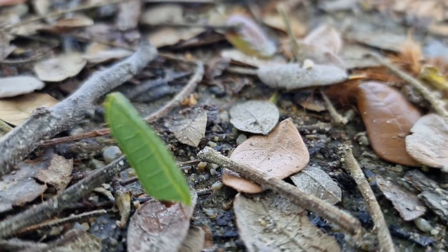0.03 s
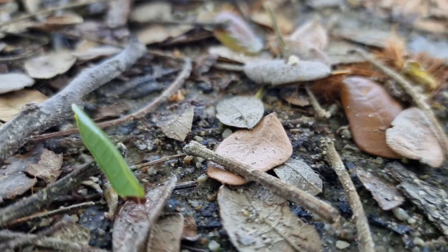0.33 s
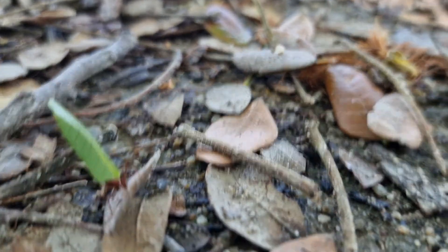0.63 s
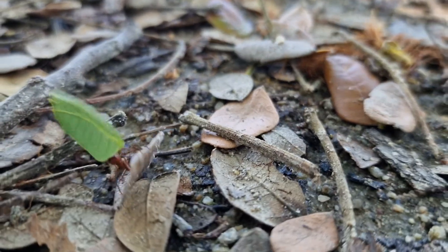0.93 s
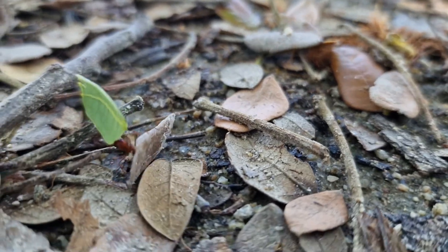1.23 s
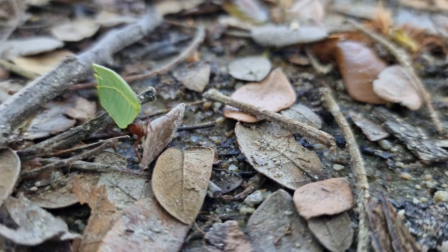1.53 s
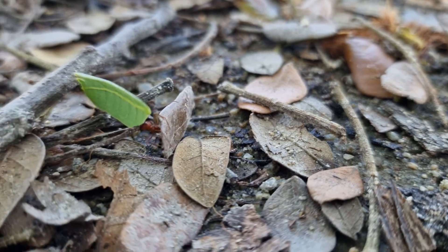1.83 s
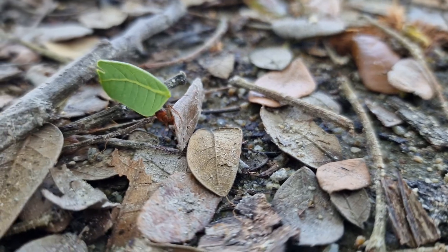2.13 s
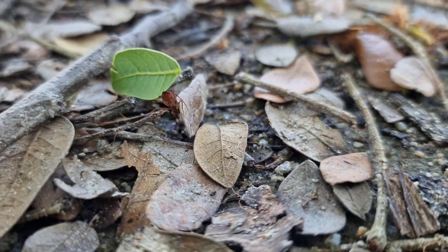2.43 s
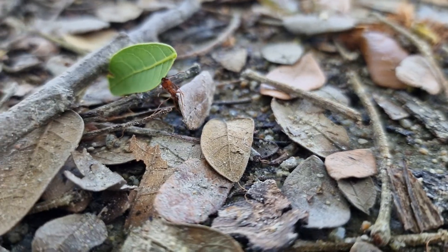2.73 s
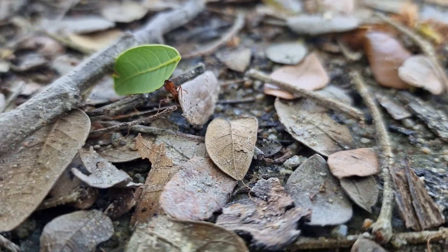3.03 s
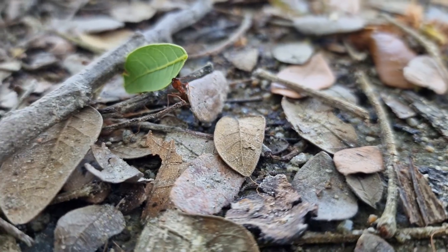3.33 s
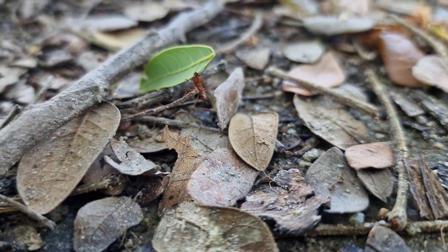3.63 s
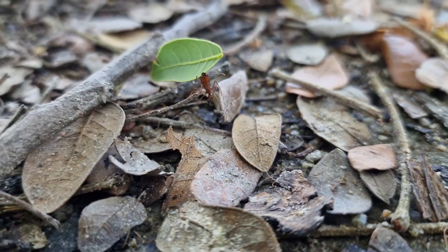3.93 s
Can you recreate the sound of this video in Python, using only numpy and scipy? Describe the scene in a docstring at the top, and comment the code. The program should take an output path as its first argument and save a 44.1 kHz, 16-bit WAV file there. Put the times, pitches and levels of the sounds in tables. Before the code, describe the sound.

A low rumble of far-off traffic runs under a soft hiss and faint birds. Near the microphone, low over fallen leaves outdoors, a few crisp leaf snaps come first; later a small bird chirps sharply and starts a trill.

```python
"""Distant traffic rumbles from the start, with engines droning and revving inside it, while dry leaves
tick and crackle close by. The traffic is low, swaying noise plus engine tones; each leaf snap is a tiny
burst of noise. Later a small bird whistles three clusters of sharp chips and starts a falling trill.
Other birds call faintly from farther off, over a soft hiss. Two microphones listen outdoors, just above
the fallen leaves."""
import sys
import numpy as np
from scipy import signal
from scipy.fft import rfft, irfft
from scipy.io import wavfile

SR = 44100
rng = np.random.default_rng(int(sys.argv[2]) if len(sys.argv) > 2 else 0)


def to_wav(sig):
    """Store sig (one row per channel, or 1-D mono) as 16-bit WAV at the path in sys.argv[1].

    Samples outside -1..1 are clipped; the rate is SR.
    """
    pcm = np.clip(np.atleast_2d(sig), -1, 1) * 32767
    pcm = np.round(pcm).astype(np.int16)
    wavfile.write(sys.argv[1], SR, pcm.T)  # frames by channels


N = 176400
T = np.arange(N) / SR
HZ = np.fft.rfftfreq(N, 1 / SR)


# how strong the rumble is from low to high (frequency [Hz], level [dB])
RUMBLE_COLOUR = [(20, -35), (31, -24), (40, -5), (55, -6.5), (90, -1.5), (135, -4.5), (200, -9),
                 (255, -13.5), (320, -16.5), (480, -21), (660, -23), (1000, -27.5), (2000, -36.5),
                 (4000, -48), (16000, -69)]
# how loud the exhausts and the tyres are (time [s], level [dB])
EXHAUST_LEVEL = [(0, -26), (1.2, -25.5), (2.6, -26.5), (4, -26.5)]
TYRE_LEVEL = [(0, -25), (.8, -24.5), (1.8, -24), (2.6, -27), (3.2, -26.5), (4, -26.5)]

def traffic(split_hz=330, exhaust_sway_db=-1.5, tyre_sway_db=0.56):
    """Exhausts rumble low down and tyres roar above them, each swaying in loudness."""
    noise = surrounding_noise(RUMBLE_COLOUR)
    low = filtered(noise, 1 / (1 + (HZ / split_hz) ** 4))
    exhausts = low * amp(curve(EXHAUST_LEVEL) + exhaust_sway_db * drift(7.8))
    tyres = (noise - low) * amp(curve(TYRE_LEVEL) + tyre_sway_db * drift(8.7))
    return exhausts + tyres


# engines holding their speed (pitch [Hz], level [dB])
ENGINE_DRONES = [(76, -35.5), (129, -37.5), (157, -37), (188.5, -36.5), (234, -42.5), (266, -41),
                 (533, -54)]

def droning_engines(wander=0.0114, sway_db=2.5):
    """Far engines fire at a nearly steady rate, so each one hums a single note."""
    out = np.zeros((2, N))
    for hz, db in ENGINE_DRONES:
        pitch = hz * (1 + wander * drift(2.65))
        phase = 2 * np.pi * (np.cumsum(pitch) / SR + rng.random())
        skew = 0.22 * hz / 188.5 * drift(1.3)  # left and right slip out of step, more for high notes
        hum = np.sin([phase + skew, phase - skew])
        out += amp(db) * unit(hum * amp(sway_db * drift(2.8)))
    return out


# engines changing speed (start [s], length [s], first pitch [Hz], last pitch [Hz], level [dB])
ENGINE_REVS = [(-.2, 1.125, 117.8, 133, -29), (0.674, 0.65, 85.85, 109.7, -26.5),
               (1.557, 0.72, 108, 84.3, -32.5), (1.808, 0.62, 193.4, 188.3, -29.5),
               (3.065, 0.576, 89.7, 106.8, -28.5), (3.133, 1.53, 50, 59.5, -34)]

def revving_engines(wander=0.013):
    """An engine's note rises or falls with its firing rate, swelling and then fading."""
    out = np.zeros(N)
    for start, length, first_hz, last_hz, db in ENGINE_REVS:
        progress = np.clip((T - start) / length, 0, 1)
        pitch = (first_hz + (last_hz - first_hz) * progress) * (1 + wander * drift(7.8))
        swell = (4 * progress * (1 - progress)) ** 0.67
        out += amp(db) * swell * unit(tone(pitch))
    return out


# single leaf snaps (time [s], level [dB], left minus right [dB], brightness [dB per octave])
LEAF_SNAPS = [(.1705, -27.5, 8, -2), (0.2606, -25, 14, 4), (0.282, -31, 8, 2), (0.2842, -22.5, 13, -1),
              (0.2989, -23.5, 11, 1), (0.3327, -28.5, 12, 3), (0.363, -31, 10, 0), (.3997, -33, 10, 1),
              (0.416, -26, -5, 0), (0.4597, -27.5, 13, 2), (.481, -21, 5, -2.5), (0.5163, -30, 8, 0),
              (0.531, -25, 4, -1), (2.892, -41, 6, 9), (3.4743, -36, 9, 5), (3.481, -40, 9, 10)]
# the tone colour all snaps share (frequency [Hz], level [dB])
SNAP_COLOUR = [(1500, -16), (3200, -15), (4400, 4.5), (5200, -8), (6500, 3.5), (7600, 3), (9000, -5.5),
               (10000, -15), (11900, -6), (13500, -18), (16000, -9)]

def leaf_ticks(decay_s=0.00065, tail_s=0.0036, tail_db=-14, pivot_hz=7000):
    """Dry leaves snap: each tick, dull or crisp, is a burst of noise with a faint tail."""
    out, t = np.zeros((2, N)), T[:SR // 25]
    middle = len(t) // 2
    fade = np.exp(-t / decay_s) + amp(tail_db) * np.exp(-t / tail_s)
    fade = np.roll(fade, middle)  # leaves room for the filter to ring on both sides
    octaves = np.log2(np.maximum(np.fft.rfftfreq(len(t), 1 / SR) / pivot_hz, .5))
    for start, db, side_db, bright_db in LEAF_SNAPS:
        burst = fade * rng.standard_normal((2, len(t)))
        snap = irfft(rfft(burst) * amp(bright_db * octaves), len(t))
        add(out, start - t[middle], amp(db) * pan(side_db) * snap)
    return filtered(out, amp(spectrum(SNAP_COLOUR)))


# a breaking twig (time [s], pitch [Hz], level [dB])
TWIG_SNAPS = [(.4135, 1780, -34.5)]

def twig(width_hz=240, decay_s=0.0047):
    """A twig gives way with a faint woody tick: a narrow band of noise that dies fast."""
    out, t = np.zeros(N), T[:SR // 25]
    for start, hz, db in TWIG_SNAPS:
        ring = unit(filtered(rng.standard_normal(N), np.exp(-((HZ - hz) / width_hz) ** 2)))
        add(out, start, amp(db) * ring[:len(t)] * np.exp(-t / decay_s))
    return out


# patches of crackle (middle [s], half length [s], level [dB])
CRACKLE_PATCHES = [(.16, 0.037, -53), (0.656, 0.076, -55), (1.22, 0.03, -63), (1.745, 0.018, -61),
                   (1.8, 0.97, -60)]
# their tone colour (frequency [Hz], level [dB])
CRACKLE_COLOUR = [(2000, -16), (4500, -15), (8000, 4), (10000, -4), (13000, -2), (15500, -0.5)]

def leaf_crackle(clicks_per_s=520, spread_db=4.2):
    """Dry leaves rustle in patches made of many tiny clicks of random size."""
    clicks = (rng.random((2, N)) < clicks_per_s / SR) * rng.choice([-1, 1], (2, N))
    sizes = amp(spread_db * np.minimum(rng.exponential(1, (2, N)), 4))
    swell = sum(amp(db) * np.exp(-((T - middle) / half) ** 2) for middle, half, db in CRACKLE_PATCHES)
    return swell * unit(filtered(clicks * sizes, amp(spectrum(CRACKLE_COLOUR))))


# the near bird's notes (start [s], length [s], first pitch [Hz], last pitch [Hz], level [dB])
NEAR_CHIPS = [(2.718, .008, 5630, 4900, -30.5), (2.724, .008, 4550, 3800, -39),
              (2.738, 0.0092, 4540, 3550, -37), (2.752, 0.0105, 6620, 5700, -33.5),
              (2.838, 0.0054, 4270, 3470, -38), (2.8535, 0.0075, 5450, 4960, -23.5),
              (2.862, 0.0086, 4700, 3470, -34), (2.870, .007, 7340, 5200, -39),
              (3.000, 0.007, 5880, 4950, -25.5), (3.008, 0.0055, 4670, 3400, -34)]
NEAR_TRILL = [(3.8805, .155, 5680, 3900, -33.5)]
ECHO_DB, ECHO_S = -11, .17

def near_bird(trill_echo_db=-8.5):
    """A small bird whistles quick downward chips, then a raspy falling trill, with light echoes."""
    chips = whistles(NEAR_CHIPS, jitter=0.022)
    trill = whistles(NEAR_TRILL, warble=.085, jitter=0.034)
    direct = arrive(chips, side_db=5.5, lead_s=85e-6) + arrive(trill, side_db=-3, lead_s=-77e-6)
    return direct + echoes(amp(ECHO_DB) * chips + amp(trill_echo_db) * trill, ECHO_S)


# far pips (start [s], length [s], pitch [Hz], level [dB])
DISTANT_PIPS = [(0.647, 0.02, 6050, -45.5), (1.375, 0.028, 6000, -46), (2.185, 0.068, 5960, -51),
                (3.64, 0.037, 6200, -54)]
# far trills (start [s], length [s], first pitch [Hz], last pitch [Hz], level [dB])
DISTANT_TRILLS = [(.51, 0.2, 5230, 4080, -52), (.7, .3, 4500, 3700, -53), (1.23, .14, 4150, 4450, -50.5),
                  (3.33, .17, 4580, 3750, -53)]

def far_birds(direct_db=-6):
    """Far birds whistle thin, clean pips, and trills that echoes blur into a twitter."""
    pips = whistles([(start, length, hz, hz, db) for start, length, hz, db in DISTANT_PIPS])
    trills = whistles(DISTANT_TRILLS, warble=.0425, jitter=0.0297)
    twitter = amp(direct_db) * trills + echoes(trills, fade_s=.3)
    return pips + echoes(amp(ECHO_DB) * pips, ECHO_S) + twitter


# the tone colour of the hiss (frequency [Hz], level [dB])
HISS_COLOUR = [(1200, -35), (2500, -14), (3200, 0.5), (4300, 0.5), (5100, -2), (6200, -1.5), (6900, -4),
               (7600, -1.5), (8500, -7.5), (9800, -18.5), (10900, -22), (11600, -15.5), (13500, -17.5),
               (16000, -28)]
# how loud the hiss is (time [s], level [dB])
HISS_LEVEL = [(0, -50.5), (.7, -48.5), (1.05, -50.5), (1.7, -47), (2.3, -49), (2.7, -50.5), (3.4, -52.5),
              (3.85, -53.5)]
# its highest part compared with the rest (time [s], level [dB])
TREBLE_LEVEL = [(0, -1.5), (.9, 0), (1.8, 1.5), (2.5, -.5), (3.2, -3), (3.75, -8)]

def hiss(split_hz=9500, flicker_db=1.16):
    """A soft, airy hiss flickers, swells midway and then grows duller."""
    noise = surrounding_noise(HISS_COLOUR)
    low = filtered(noise, 1 / (1 + (HZ / split_hz) ** 8))
    treble = (noise - low) * amp(curve(TREBLE_LEVEL))
    return (low + treble) * amp(curve(HISS_LEVEL) + flicker_db * drift(22))


# how alike the two microphones sound (frequency [Hz], likeness [-1 to 1])
MIC_LIKENESS = [(60, .993), (140, .98), (280, .86), (560, .54), (1100, -.17), (2200, -.03), (4200, -.2),
                (7000, .02)]
# how much louder the left one is (frequency [Hz], left minus right [dB])
MIC_BALANCE = [(120, 0.55), (300, 1.7), (2000, 1.7), (4200, .3), (7500, 3), (13000, 3)]

def surrounding_noise(colour):
    """Noise from all around: two close microphones get nearly the same lows but different highs."""
    shared, opposite = rfft(rng.standard_normal((2, N)))
    likeness = np.clip(spectrum(MIC_LIKENESS), -.999, .999)
    shared *= np.sqrt(1 + likeness)
    opposite *= np.sqrt(1 - likeness)
    lean = amp(spectrum(MIC_BALANCE) / 2)
    pair = np.array([(shared + opposite) * lean, (shared - opposite) / lean])
    return unit(irfft(pair * amp(spectrum(colour)), N))


def whistles(notes, warble=0, jitter=0.014, warble_hz=55):
    """Bird notes glide, swell and fade; warble shakes the pitch evenly, jitter at random."""
    out = np.zeros(N)
    for start, length, first_hz, last_hz, db in notes:
        t = np.arange(0, length, 1 / SR)
        progress = t / length
        glide = first_hz + (last_hz - first_hz) * progress
        shake = 1 + warble * np.sin(2 * np.pi * warble_hz * t) + jitter * drift(306)[:len(t)]
        add(out, start, amp(db) * np.sin(np.pi * progress) * tone(glide * shake))
    return out


def arrive(x, side_db, lead_s):
    """A sound reaches the left microphone louder and sooner (the right, for negative values)."""
    delayed = filtered(x, np.exp(-2j * np.pi * HZ * lead_s))
    return pan(side_db) * np.array([x, delayed])


def echoes(x, fade_s):
    """Sound bounces off trunks and ground, dying away by 60 dB in fade_s."""
    t = T[:SR // 2]
    bounces = rng.standard_normal((2, len(t))) * amp(-60 * t / fade_s) * (t > .003)
    bounces /= np.linalg.norm(bounces, axis=1, keepdims=True)
    return signal.fftconvolve(x[None], bounces, axes=1)[:, :N]


def tone(hz):
    """A pure tone that follows a changing pitch."""
    return np.sin(2 * np.pi * np.cumsum(hz) / SR)


def amp(db):
    """Turns decibels into a multiplier."""
    return 10 ** (np.asarray(db) / 20)


def unit(x):
    """Scales to an average strength (rms) of 1."""
    return x / np.sqrt(np.mean(x ** 2) + 1e-20)


def spectrum(points):
    """Joins (frequency [Hz], value) points, with octaves evenly spaced."""
    hz, value = np.transpose(points)
    return np.interp(np.log(HZ + 1), np.log(hz + 1), value)


def curve(points):
    """Joins (time [s], value) points with straight lines."""
    return np.interp(T, *np.transpose(points))


def filtered(x, gain):
    """Multiplies each frequency by its own gain."""
    return irfft(rfft(x) * gain, N)


def drift(rate_hz):
    """A smooth random wobble of strength 1; a higher rate moves faster."""
    return unit(filtered(rng.standard_normal(N), np.exp(-(HZ / rate_hz) ** 2) * (HZ > 0)))


def pan(db):
    """Left and right multipliers that make the left louder by db."""
    return unit(amp([[db / 2], [-db / 2]]))


def add(mix, start_s, sound):
    """Mixes a sound in at a given time."""
    part = mix[..., max(round(start_s * SR), 0):][..., :sound.shape[-1]]
    part += sound[..., :part.shape[-1]]


def scene():
    """Everything heard at the two microphones."""
    steady_bed = traffic() + droning_engines() + revving_engines() + hiss()
    return steady_bed + leaf_ticks() + twig() + leaf_crackle() + near_bird() + far_birds()


def record(dry):
    """The recorder cuts off everything above 16000 Hz."""
    lowpass = signal.firwin(511, 16000, window=("kaiser", 9), fs=SR)
    return signal.oaconvolve(dry, lowpass[None], "same")


dry = scene()
out = record(dry)
to_wav(out)
```